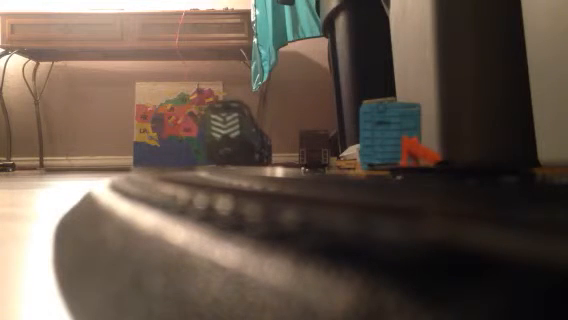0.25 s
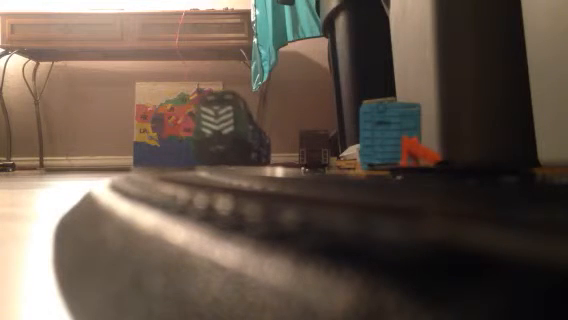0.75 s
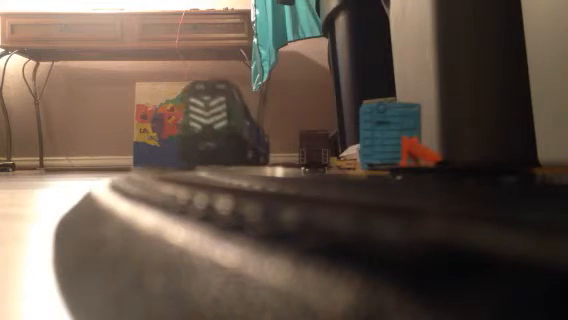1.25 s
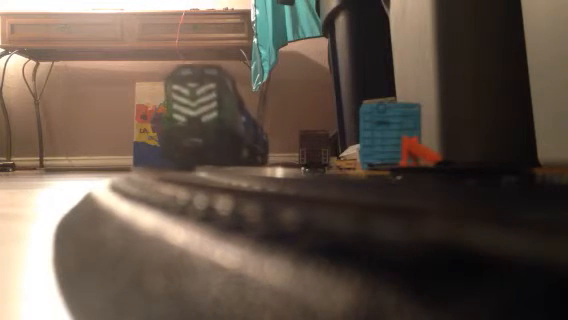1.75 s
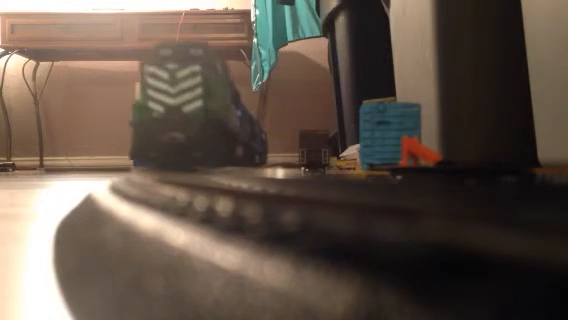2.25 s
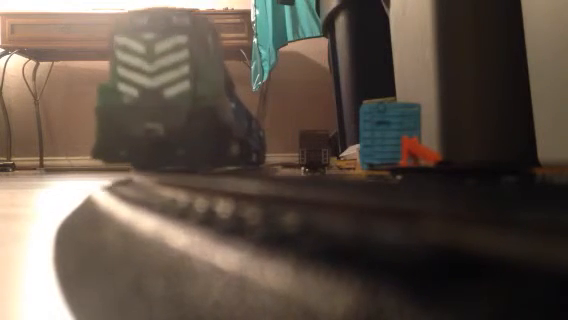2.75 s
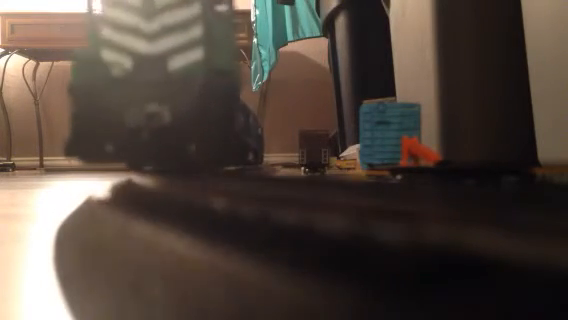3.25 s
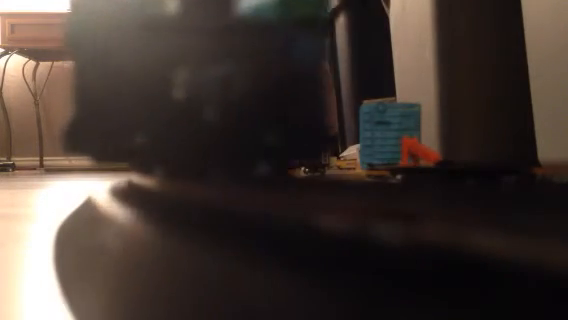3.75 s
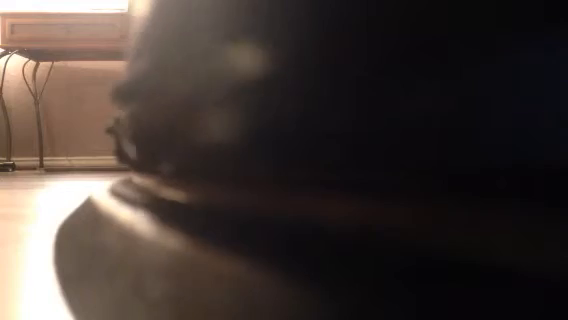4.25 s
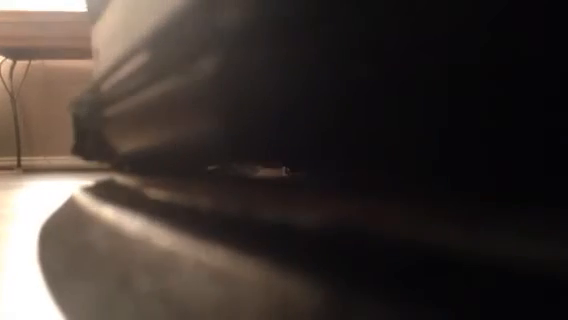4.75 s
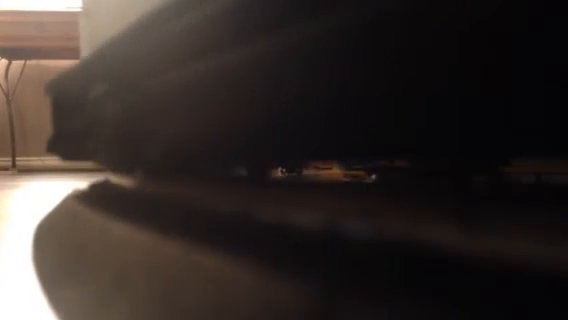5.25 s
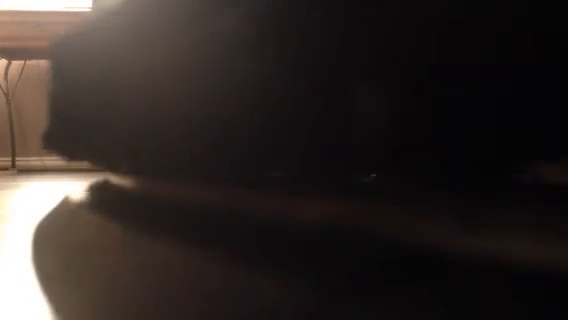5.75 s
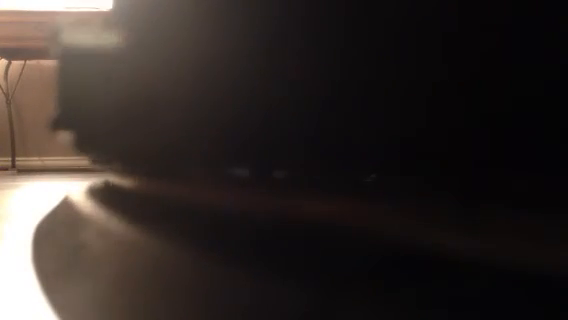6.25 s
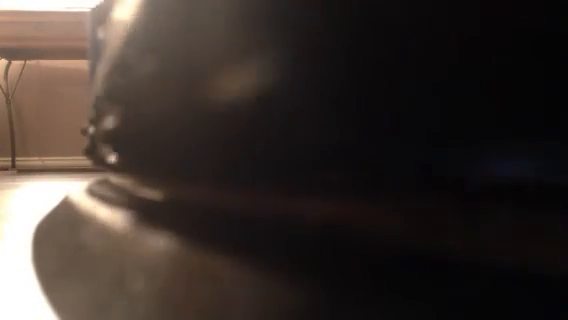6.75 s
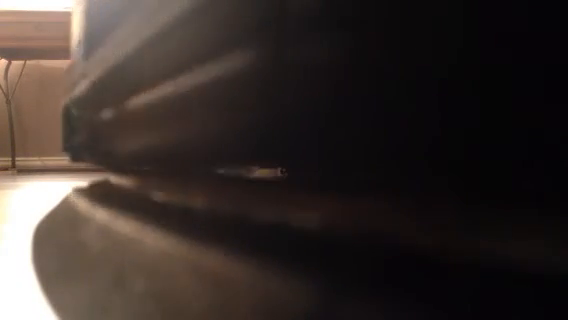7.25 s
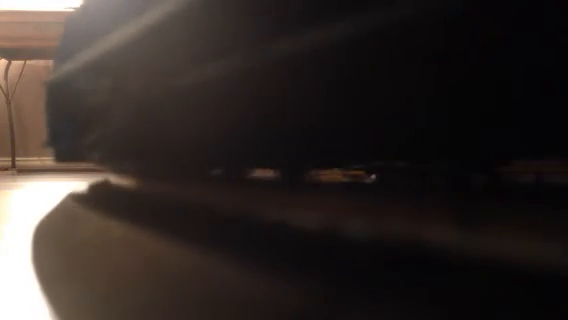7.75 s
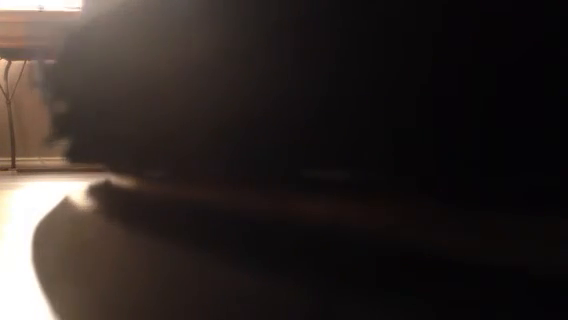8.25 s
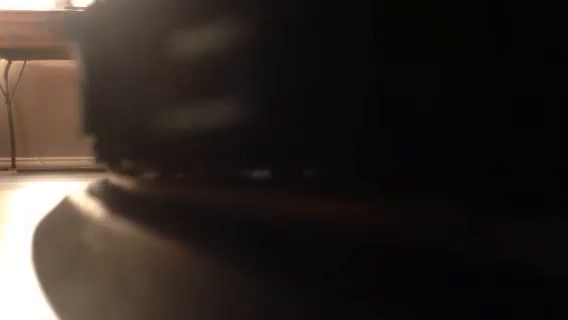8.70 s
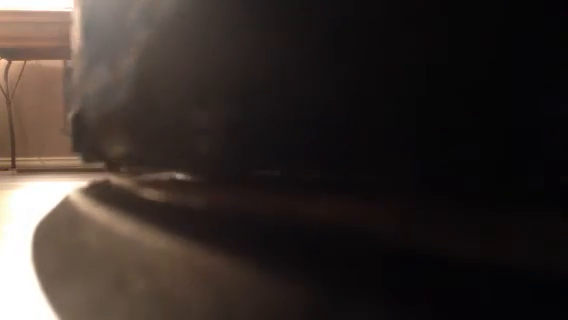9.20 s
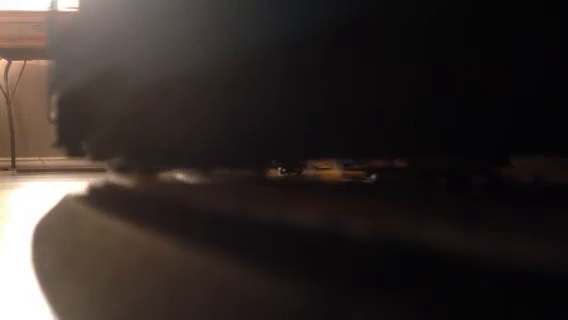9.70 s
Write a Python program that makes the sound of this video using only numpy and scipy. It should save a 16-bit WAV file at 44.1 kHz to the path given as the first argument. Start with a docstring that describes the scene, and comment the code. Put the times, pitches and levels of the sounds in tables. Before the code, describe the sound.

Fine gear whirr and wheel grind grow louder with scattered metallic clicks, a hard scrape and knock midway, then close booming roll and sharp clacks.

```python
"""A small model locomotive and its wagons roll along sectional track on a hard floor, up to and past a camera.
Random contacts, filtered into broad colours, give the fine grind of the wheels and the whirr of the gears;
the same kind of contacts through damped modes give the booming floor, boards and track.
Short ragged bursts through ringing modes make joint clicks, axle drops, scrapes and loose rattles in a small room.
The engine knocks the camera in a flurry of touches, a flange hisses on the rail, and quiet room tone lies below."""
import sys
import numpy as np
from scipy import signal
from scipy.fft import rfft, irfft, next_fast_len
from scipy.io import wavfile

SR = 44100
rng = np.random.default_rng(int(sys.argv[2]) if len(sys.argv) > 2 else 0)


def materialize(psi):
    """Save the field psi as 16-bit PCM at rate SR to the path in sys.argv[1].

    A 1-D psi becomes a single channel; in a 2-D psi each row is a channel.
    """
    bounded = np.clip(np.atleast_2d(psi).T, -1, 1)
    quanta = np.round(bounded * 32767).astype(np.int16)
    wavfile.write(sys.argv[1], SR, quanta)


N = 439677

# room tone colour: (frequency [Hz], relative density [dB per Hz])
ROOM_TONE = [(15, -45), (34, -16), (58, -6.5), (266, -19), (358, 2.5), (892, -11), (3510, -14),
             (15400, -44.5)]
ROOM_TONE_DB = -56.5

# flange rubbing the rail: (time [s], core level [dB], skirt level [dB])
FLANGE_RUB = [(6.6, -110, -83), (7.5, -82, -76), (7.75, -70.5, -79), (8.1, -61.5, -79), (8.35, -68, -76),
              (8.7, -100, -80)]
RUB_HZ, RUB_WIDTH_HZ, SKIRT_HZ, SKIRT_WIDTH_HZ = 8300, 1200, 10000, 4000

# engine touching the camera: (time [s], case drive [dB], thud drive [dB])
KNOCKS = [(4.6496, -11.5, -49), (4.6569, -14, -19), (4.662, -27, -8), (4.6652, -11.5, -33),
          (4.677, -12.5, -34), (4.68, -35, -8.5)]
# ringing of the camera case: (frequency [Hz], level against the drive [dB], t60 [s])
CASE_MODES = [(639, -0.5, 0.036), (397, -14.5, 0.014), (860, -11, 0.015)]
THUD_HZ, THUD_T60_S = 162, 0.034

# Blows: shell levels are relative to the snap, before a common lift; lengths include some ringing.
# light wheel and coupler clicks: (time [s], snap peak [dB], shell level [dB], length [ms])
CLICKS = [(0.103, -18.5, -16, 4.9), (0.15, -33, -18, 11.5), (0.187, -37.5, -6, 4.8),
          (0.2583, -32.5, -28, 7.2), (0.3349, -25, -12.5, 8.1), (0.37, -23.5, -16, 6.1),
          (0.4, -34.5, -9, 16), (0.572, -27, -16, 6.2), (0.6223, -39, -10, 14), (0.644, -36, -20, 6.2),
          (1.461, -32, -20, 5.4), (1.655, -33.5, -13, 16), (1.7096, -30, -15, 4.1), (1.745, -32, -21, 12),
          (1.767, -31, -20, 5.6), (1.7985, -21, -13, 15.8), (2.11, -32.5, -18, 6.5),
          (2.208, -31.5, -15, 16.5), (2.246, -23.5, -20, 8.8), (2.2551, -19.5, -18, 4.7),
          (2.4335, -20, -22, 5.5), (2.443, -28.5, -8, 18), (2.619, -33.5, -13, 5), (2.688, -31.5, -11, 5.8),
          (2.7038, -24, -18, 5.6), (3.256, -30, -23, 7.5), (3.475, -33, -20, 5), (3.5004, -33.5, -4, 5),
          (3.519, -27.5, -13, 8.6), (3.5983, -17.5, -21, 6.3), (3.76, -31, -11, 4.2),
          (3.7873, -29.5, -7, 3.9), (3.825, -19, -15.5, 6.8), (3.8686, -28.5, -5, 8.7),
          (3.901, -32, -14, 5.7), (3.929, -29, -30, 4.1), (4.003, -30.5, -25, 5.3), (4.464, -34, -1, 4.1),
          (4.502, -27.5, -30, 5.1), (4.513, -25, -6.5, 12.4), (4.733, -27.5, -4.5, 7.9),
          (4.7767, -25, -5, 2.9), (4.789, -31, -10, 6), (4.864, -29, -30, 4.4), (5.2115, -31, 3.5, 6.1),
          (5.2866, -33, -20, 4), (5.6395, -33, -8, 3.8), (5.684, -32.5, -14, 6.6), (5.6983, -27, -14, 3.2),
          (5.833, -31.5, -1, 6.4), (6.024, -27.5, -32.5, 5.7), (6.039, -30, -4, 8.7),
          (6.2225, -30, -1.5, 4.2), (6.8031, -29.5, -15, 4), (7.0323, -22, -7, 5.1),
          (7.2455, -18.5, -5.5, 11), (7.265, -28.5, 1, 5.8), (7.397, -27, -0.5, 5.5), (7.5288, -28.5, 0, 4),
          (7.5494, -26.5, -5, 5.4), (7.595, -29, -8, 8.3), (7.775, -25.5, -2.5, 4.8),
          (8.0248, -26.5, -5, 5.2), (8.09, -15.5, -11, 6), (8.7601, -12, -5, 4.5), (8.9088, -34, 3, 7),
          (8.9623, -28, -2, 4.2), (9.012, -27.5, -3, 6.8), (9.354, -18.5, -6.5, 2.3),
          (9.6685, -25, -3, 5.2), (9.7384, -7.5, -9, 4.7), (9.9088, -27.5, -5, 4.4)]
# axles dropping at a rail joint: (time [s], snap peak [dB], shell level [dB], length [ms],
# thump peak before a common lift [dB])
AXLE_DROPS = [(0.354, -23.5, -13, 9.2, -35.5), (1.3681, -23, -16, 6.5, -37), (1.591, -28, -18, 8.8, -38.5),
              (4.0463, -19.5, 0, 12.3, -36), (5.056, -25, 0, 18.6, -28), (6.0667, -28.5, 4.5, 10.8, -27),
              (6.553, -22.5, 0.5, 9.8, -24.5), (7.2896, -23, 4.5, 13.2, -40),
              (7.4706, -16, -6, 3.48, -28.5), (8.394, -20, -1.5, 6.6, -25),
              (8.8918, -22.5, -5.5, 12.2, -30.5), (9.3902, -20.5, -0.5, 4.9, -24),
              (9.7172, -18.5, -4.5, 6.6, -30)]
# metal scraping the camera: (time [s], snap peak [dB], shell level [dB], length [ms])
SCRAPES = [(4.6463, -5.5, -9, 2.6), (4.6565, -10.5, -10, 4.6), (4.6605, -13, -15, 3),
           (4.671, -19, -16, 2.7), (4.677, -24, -12, 2.5), (4.6907, -21, -15, 4.5), (4.6975, -29, -20, 3.6),
           (4.7104, -33, -1, 3)]
# ringing parts of a blow, before each blow's own random favour: (frequency [Hz], level [dB], t60 [s])
SNAP_MODES = [(3250, 3, 0.0079), (3564, 2.5, 0.0073), (2786, -1, 0.0082), (4120, -3, 0.007)]
SHELL_MODES = [(775, -4.5, 0.013), (1163, 0.5, 0.0094), (1506, 1, 0.007), (1833, 4, 0.0064),
               (2330, 0, 0.0088)]
EDGE_MODES = [(5180, 8, 0.0032), (6210, 4.5, 0.0027), (8000, -8.5, 0.002), (11300, -26, 0.0015)]
THUMP_MODES = [(105, -9, 0.15), (173.5, -4, 0.17), (342, 0.5, 0.048), (646, 6.5, 0.024)]
SHELL_LIFT_DB, THUMP_LIFT_DB, THUMP_LAG_S = 1.5, 0.5, 0.0012
# bright edge against the snap: mean for each kind of blow, and random spread
EDGE_DB, SCRAPE_EDGE_DB, RATTLE_EDGE_DB, EDGE_SPREAD_DB = -15, -10.5, -16, 3
TAIL_DB, TAIL_S = -16, 0.016   # tail peak against the snap, mean length of its contacts

# loose couplers: rattles per second for each unit of busyness, which follows how many clicks
# and drops lie near; least size over the whirr
RATTLE_DENSITY, RATTLE_DB = 50, 7.5
BUSY_S = 0.3   # full width of the window that gathers rattles around clicks and drops

# gear whirr as the train nears: (time [s], level [dB])
NEARING = [(0, -59.5), (.7, -56.5), (1.3, -56.5), (1.55, -52), (2.0, -53.5), (2.55, -51), (3.3, -53),
           (4.1, -49.5), (5.4, -49.5), (5.9, -47), (7.2, -45), (8.0, -46), (9.4, -46.5), (9.97, -45)]
# colours of the grind and the whirr: (frequency [Hz], relative density [dB per Hz])
GRIND = [(230, -16.5), (340, -9), (640, -3.5), (880, -6), (1050, -3.5), (1480, -5), (1650, -7.5),
         (2600, -15), (3400, -53)]
WHIRR = [(1180, -14.5), (2000, -2), (3040, 1.5), (3480, 2.5), (3900, -2), (4250, -7.5), (4820, -13),
         (8190, -32), (15400, -44)]
GRIND_FAR_DB, GRIND_BESIDE_DB, GRIND_GROWS_S = -3, 2.5, 0.56   # wheel grind against the whirr
# modes shaken by rolling: (frequency [Hz], width of the first of two passes [Hz], level [dB])
FLOOR_MODES = [(91.1, 26, -3), (108.7, 12, -6)]
BOARD_MODES = [(159, 71, 0.5), (184, 78, -1.5)]
TRACK_MODES = [(346.4, 62.5, 2.5), (297, 40, -6.5)]
WHEEL_MODES = [(651, 110, -5.5), (1126, 250, -1), (1384, 200, 3), (3486, 140, -3)]
WHEEL_DB = -6.5   # wheel ring against the grind
# one row each for floor, floorboard, track: (far level at the start [dB], far rise [dB/s],
# level beside the camera [dB], gain on the hollow stretch [dB], gain under a full-weight bogie [dB])
LOW_LEVELS = [(-74.5, 2.5, -48.5, 2.5, 3), (-73.5, 1.24, -58, 11, 11.5), (-69, 3, -49, 12.5, 5)]
# bogies rolling past: (middle time [s], length [s], weight [0-1])
BOGIES = [(4.637, 0.45, 1), (6.508, 0.52, 1), (7.2, 1.7, 0.95), (8.553, 1.18, 0.92), (9.346, 1.4, 0.8)]
BESIDE_S, BESIDE_RISE_S = 4.35, 0.2   # the train's weight reaches the floor under the camera
# a hollow-sounding stretch of track
HOLLOW_FROM_S, HOLLOW_TO_S, HOLLOW_RISE_S, HOLLOW_FALL_S = 1.27, 2.74, 0.37, 0.25


def from_db(db):
    """Decibels to gain."""
    return 10 ** (np.asarray(db) / 20)


def rms_one(x):
    """Scale to rms 1."""
    return x / np.sqrt(np.mean(x ** 2) + 1e-20)


def in_time(rows):
    """Draw the columns of a curve table sample by sample."""
    s, *columns = np.transpose(rows)
    return [np.interp(np.arange(N) / SR, s, column) for column in columns]


def ramp(start_s, rise_s):
    """Rise from 0 to 1, sample by sample."""
    return np.clip((np.arange(N) / SR - start_s) / rise_s, 0, 1)


def drift(rate_hz):
    """Slow random wander of spread about 1, made at a fortieth of the sample rate."""
    r = np.exp(-80 * np.pi * rate_hz / SR)
    noise = rng.standard_normal(N // 40 + 2002)
    slow = signal.lfilter([1], [1, -2 * r, r * r], noise)[2000:]   # skip the filter's start
    return np.interp(np.arange(N) / 40, np.arange(len(slow)), rms_one(slow))


def colour(x, spectrum):
    """Shape x by a (Hz, dB) spectrum; rms 1."""
    size = next_fast_len(N)
    hz, level_db = np.transpose(spectrum)
    bins_hz = np.maximum(np.arange(size // 2 + 1) * SR / size, 1)
    gain = from_db(np.interp(np.log(bins_hz), np.log(hz), level_db))
    return rms_one(irfft(rfft(x, size) * gain, size)[:N])


def resonate(x, hz, width_hz):
    """One damped resonance, gain about 1 on top."""
    r = np.exp(-np.pi * width_hz / SR)
    zeros = np.array([1, 0, -1]) * (1 - r * r) / 2
    return signal.lfilter(zeros, [1, -2 * r * np.cos(2 * np.pi * hz / SR), r * r], x)


def ring(clicks, hz, t60):
    """A unit click starts a dying sine of height about 1."""
    r, w = from_db(-60 / (t60 * SR)), 2 * np.pi * hz / SR
    return signal.lfilter([0, np.sin(w)], [1, -2 * r * np.cos(w), r * r], clicks + 1e-18)


def grains(per_s, spread_db):
    """Random contacts of uneven size; rms 1."""
    sizes = from_db(spread_db * np.minimum(rng.exponential(1, N), 6)) * rng.standard_normal(N)
    return rms_one(sizes * (rng.random(N) < per_s / SR))


def strike(starts, peak_db, length_s, modes, count, band_hz):
    """Each blow is a ragged burst of contacts, favours modes of its own and reaches its given peak."""
    longest_t60 = max(t60 for _, _, t60 in modes)
    span = int((length_s.max() + longest_t60) * SR) + 64
    favour = from_db(4.0 * rng.standard_normal((len(starts), len(modes))))
    blows, rows = np.zeros((len(starts), span)), np.arange(len(starts))[:, None]
    for (hz, mode_db, t60), weight in zip(modes, favour.T):
        share = (np.arange(count) + rng.uniform(0, 1, (len(starts), count))) / count
        swell = (share + 0.17) * np.exp(-3.0 * share)     # swells fast, fades slowly
        sizes = rng.standard_normal(share.shape) * swell
        clicks = np.zeros_like(blows)
        np.add.at(clicks, (rows, (share * length_s[:, None] * SR).astype(int)), sizes)
        rung = ring(clicks, hz, t60)
        blows += (from_db(mode_db) * weight / np.abs(rung).max(1))[:, None] * rung
    blows = signal.sosfilt(signal.butter(3, band_hz, "band", fs=SR, output="sos"), blows)
    blows *= (from_db(peak_db) / np.abs(blows).max(1))[:, None]
    at = (starts * SR).astype(int)[:, None] + np.arange(span)
    return np.bincount(at.ravel(), blows.ravel(), N + span)[:N]


def room_tone():
    """Steady noise coloured as the quiet room."""
    return from_db(ROOM_TONE_DB) * colour(rng.standard_normal(N), ROOM_TONE)


def room(x, t60, level_db):
    """Near walls and furniture return a short dying scatter of echoes."""
    t = np.arange(int(.15 * SR)) / SR
    tail = rng.standard_normal(len(t)) * from_db(-60 * t / t60) * (t > .003)
    tail = tail / np.sqrt(np.sum(tail ** 2))
    return x + from_db(level_db) * signal.oaconvolve(x, tail)[:N]


def flange_rub():
    """Dense contacts of flange on rail hiss in a high core with a broad, brighter skirt."""
    contacts = grains(per_s=13000, spread_db=3.0)
    core_db, skirt_db = in_time(FLANGE_RUB)
    core = rms_one(resonate(contacts, RUB_HZ, RUB_WIDTH_HZ))
    skirt = rms_one(resonate(contacts, SKIRT_HZ, SKIRT_WIDTH_HZ))
    return core * from_db(core_db + 1.18 * drift(8.0)) + skirt * from_db(skirt_db)


def camera_knock():
    """Each touch sets the camera case ringing and adds one low, damped thud."""
    s, case_db, thud_db = np.transpose(KNOCKS)
    at = np.round(s * SR).astype(int)
    case, thud = np.zeros(N), np.zeros(N)
    case[at], thud[at] = from_db(case_db), from_db(thud_db)
    case_ring = sum(from_db(db) * ring(case, hz, t60) for hz, db, t60 in CASE_MODES)
    return case_ring - ring(thud, THUD_HZ, THUD_T60_S)


def loose_rattles():
    """Loose couplers rattle at random, more often around clicks and drops: rows laid out as CLICKS."""
    step_s = 100 / SR
    blow_s = np.array([row[0] for row in CLICKS + AXLE_DROPS])
    blows = np.bincount((blow_s / step_s).astype(int), minlength=N // 100 + 1)
    near_blows = np.convolve(blows, np.hanning(int(BUSY_S / step_s)), "same")
    busyness = .25 + near_blows     # a few rattles come even far from any blow
    chance = RATTLE_DENSITY * busyness * step_s
    at = np.flatnonzero(rng.random(len(chance)) < chance) * step_s
    extra_db = 2.22 * np.minimum(rng.exponential(1, len(at)), 3)
    snap_db = np.interp(at, *np.transpose(NEARING)) + RATTLE_DB + extra_db
    shell_and_ms = rng.normal([-13, 4.5], [5.0, 3.0], (len(at), 2))
    return np.column_stack([at, snap_db, shell_and_ms])


def axle_thumps():
    """Dropping axles thump the track and floor; a far thump loses the low floor modes and keeps only its higher
    rings."""
    drops = np.array(AXLE_DROPS)
    s, peak_db = drops[:, 0] + THUMP_LAG_S, drops[:, 4] + THUMP_LIFT_DB
    far = s < BESIDE_S
    out = np.zeros(N)
    for group, band_hz in ((far, [300, 760]), (~far, [70, 900])):
        length_s = np.full(group.sum(), .006)
        out += strike(s[group], peak_db[group], length_s, THUMP_MODES, count=3, band_hz=band_hz)
    return out


def joint_clicks():
    """Every blow joins a snap, a hollow shell and a bright edge; clicks and drops also rattle on."""
    rattles = loose_rattles()
    drops = np.array(AXLE_DROPS)[:, :4]
    s, snap_db, shell_db, ms = np.vstack([SCRAPES, CLICKS, drops, rattles]).T
    counts = [len(SCRAPES), len(CLICKS) + len(drops), len(rattles)]
    edge_db = np.repeat([SCRAPE_EDGE_DB, EDGE_DB, RATTLE_EDGE_DB], counts)
    edge_db = edge_db + EDGE_SPREAD_DB * rng.standard_normal(len(s))
    length = np.maximum(ms - 2.5, .6) / 1000     # seconds; contacts end before the ringing does
    snap = strike(s, snap_db, length, SNAP_MODES, count=10, band_hz=[2100, 5000])
    shell_peak_db = snap_db + shell_db + SHELL_LIFT_DB
    shell = strike(s, shell_peak_db, length, SHELL_MODES, count=10, band_hz=[550, 2800])
    edge = strike(s, snap_db + edge_db, length + .001, EDGE_MODES, count=14, band_hz=[4800, 14000])
    tailed = slice(len(SCRAPES), len(s) - len(rattles))     # clicks and drops
    tail_at = s[tailed] + length[tailed]
    tail_s = TAIL_S * rng.uniform(.5, 1.5, len(tail_at))
    tails = strike(tail_at, snap_db[tailed] + TAIL_DB, tail_s, SNAP_MODES, count=12, band_hz=[2100, 5200])
    return tails + snap + shell + edge + axle_thumps()


def boom(modes, flutter_db, per_s):
    """Rolling contacts pass each damped mode twice, for dark valleys between the modes; rms 1."""
    contacts = [grains(per_s, spread_db=3.0) for _ in range(2)]
    out = np.zeros(N)
    for k, (hz, width_hz, level_db) in enumerate(modes):
        once = resonate(contacts[k % 2], hz, width_hz)     # neighbours get separate contacts
        tone = rms_one(resonate(once, hz, 0.81 * width_hz))
        out += from_db(level_db + flutter_db * drift(2.7)) * tone
    return rms_one(out)


def low_booms(shake, beside):
    """Floor, boards and track boom, swelling under the near train and again under each bogie."""
    hollow = ramp(HOLLOW_FROM_S, HOLLOW_RISE_S) - ramp(HOLLOW_TO_S - HOLLOW_FALL_S, HOLLOW_FALL_S)
    load = np.zeros(N)
    for s, length, weight in BOGIES:
        load += weight * np.sin(np.pi * ramp(s - length / 2, length)) ** 2
    out = np.zeros(N)
    for levels, modes in zip(LOW_LEVELS, (FLOOR_MODES, BOARD_MODES, TRACK_MODES)):
        start_db, rise_db, beside_db, hollow_db, bogie_db = levels
        far_db = start_db + rise_db * np.arange(N) / SR + hollow_db * hollow
        level_db = (1 - beside) * far_db + beside * (beside_db + bogie_db * load)
        out += from_db(level_db + 1.36 * shake) * boom(modes, flutter_db=1.4, per_s=2000)
    return out


def rolling_train():
    """Fine contacts grind at the wheels, whirr in the gears and ring the wheels over the low booms."""
    whirr_db, beside = in_time(NEARING)[0], ramp(BESIDE_S, BESIDE_RISE_S)
    growth = ramp(BESIDE_S, GRIND_GROWS_S)
    grind_db = whirr_db + GRIND_FAR_DB + (GRIND_BESIDE_DB - GRIND_FAR_DB) * growth
    shake = drift(7.3)     # uneven rail shakes grind, whirr and low booms together
    grind = colour(grains(per_s=9000, spread_db=1.9), GRIND)
    grind = grind * from_db(grind_db + 1.4 * shake + 0.36 * drift(13.0))
    whirr = colour(grains(per_s=4000, spread_db=1.0), WHIRR)
    whirr = whirr * from_db(whirr_db + 1.0 * shake + 0.36 * drift(14))
    wheels = from_db(grind_db + WHEEL_DB) * boom(WHEEL_MODES, flutter_db=4.5, per_s=700)
    return grind + whirr + wheels + low_booms(shake, beside)


def scene():
    """Train, blows, knock and flange, thinned below 62 Hz, over the room tone."""
    clicks = room(joint_clicks(), t60=0.059, level_db=-12.5)
    train = rolling_train() + clicks + camera_knock() + flange_rub()
    low_cut = signal.butter(3, 62, "high", fs=SR, output="sos")
    return (signal.sosfilt(low_cut, train) + room_tone())[None]


def record(dry):
    """Cut the top steeply: 60 dB down from 15.9 kHz up."""
    return signal.sosfilt(signal.cheby2(14, 60, 15900, fs=SR, output="sos"), dry)


dry = scene()
out = record(dry)
materialize(out)
```